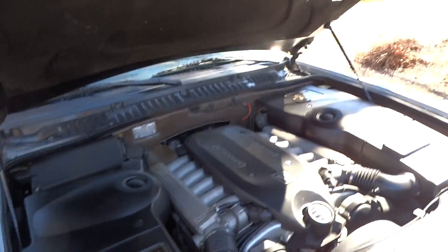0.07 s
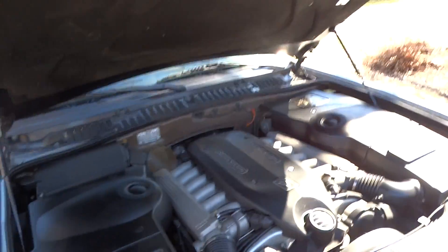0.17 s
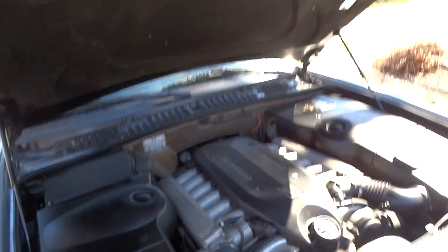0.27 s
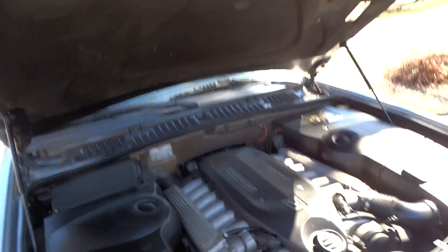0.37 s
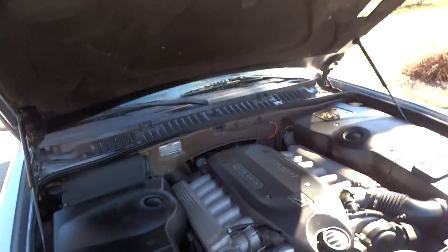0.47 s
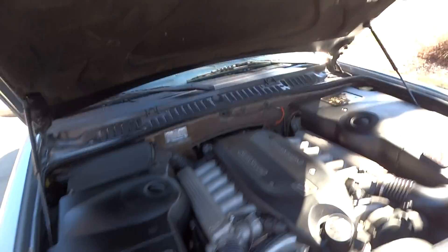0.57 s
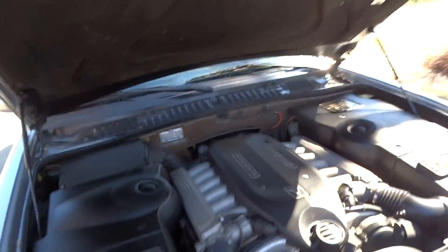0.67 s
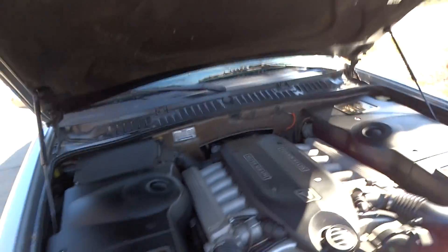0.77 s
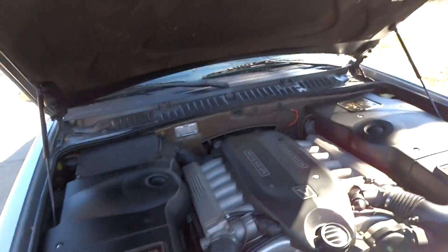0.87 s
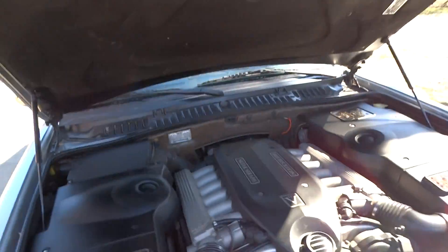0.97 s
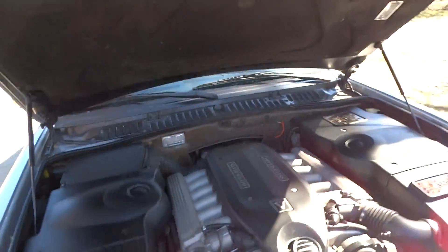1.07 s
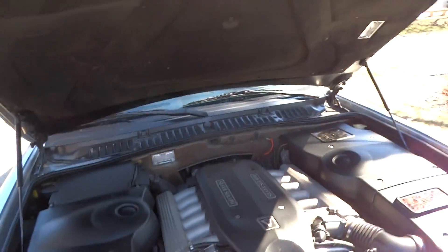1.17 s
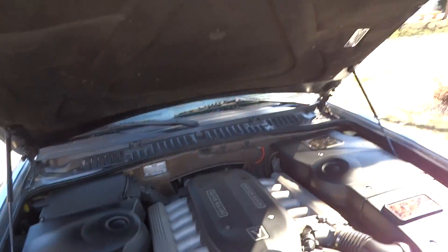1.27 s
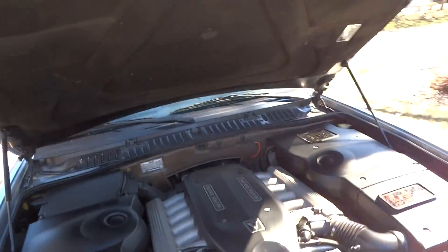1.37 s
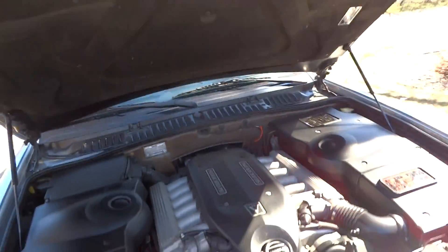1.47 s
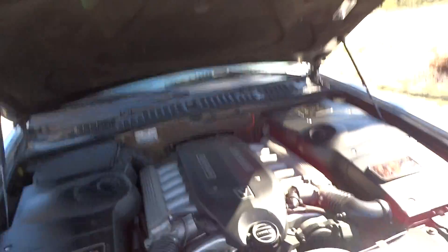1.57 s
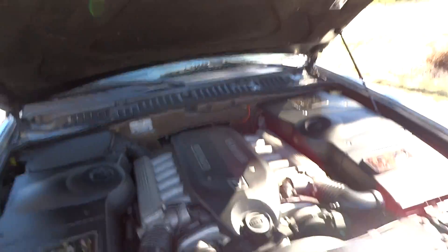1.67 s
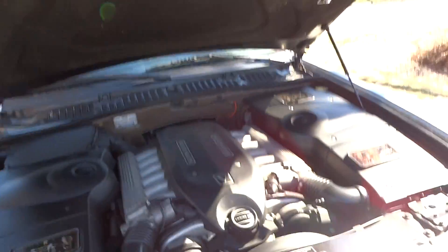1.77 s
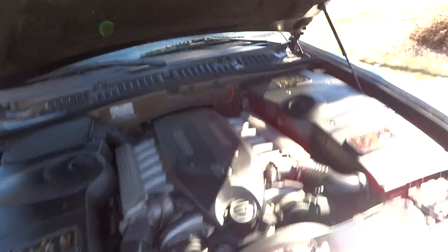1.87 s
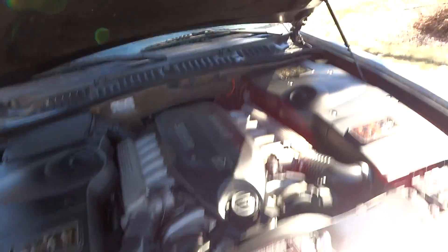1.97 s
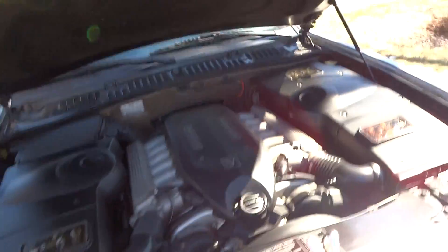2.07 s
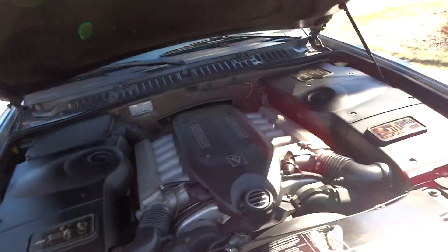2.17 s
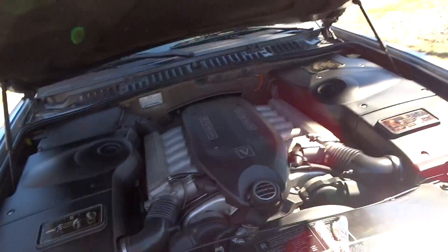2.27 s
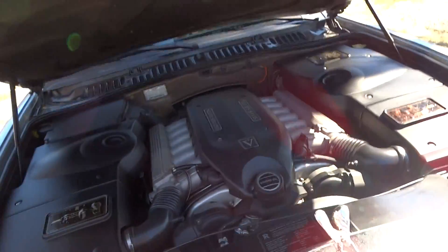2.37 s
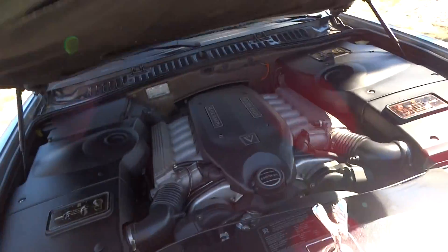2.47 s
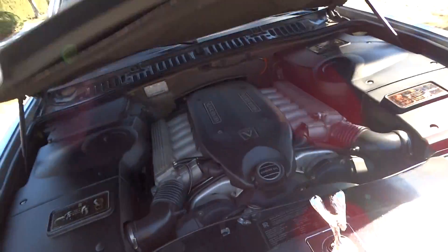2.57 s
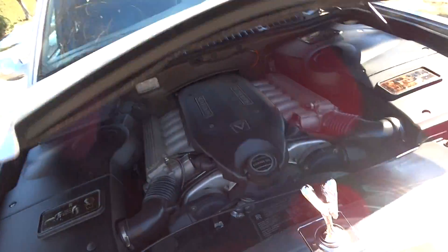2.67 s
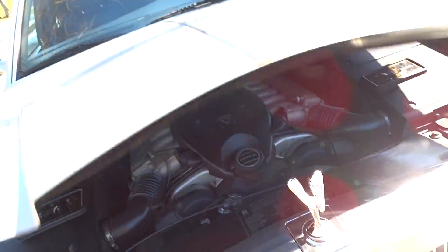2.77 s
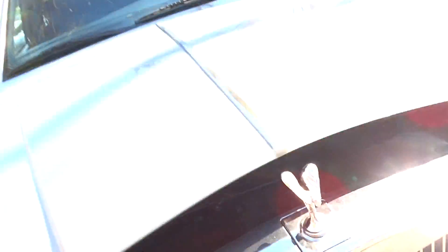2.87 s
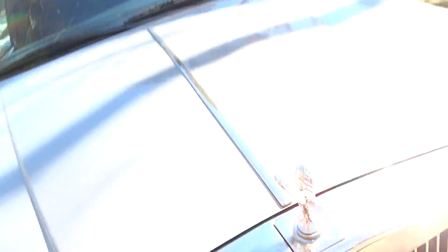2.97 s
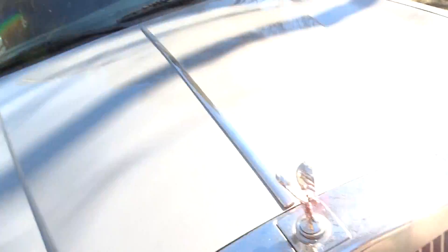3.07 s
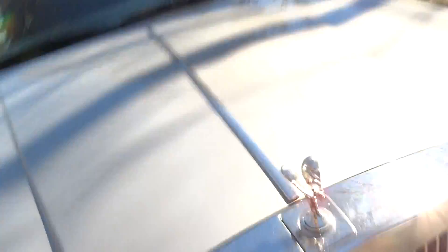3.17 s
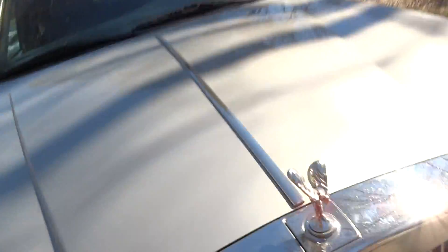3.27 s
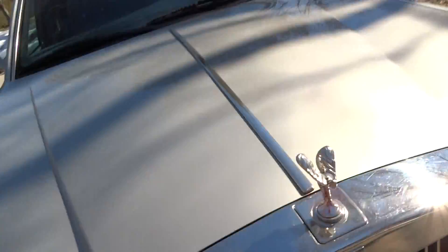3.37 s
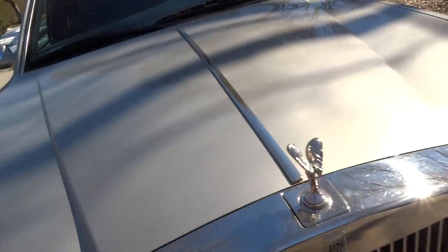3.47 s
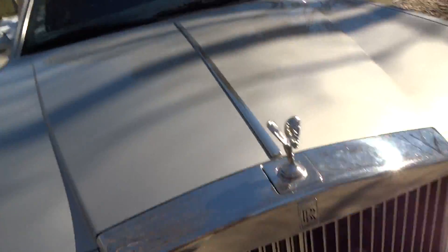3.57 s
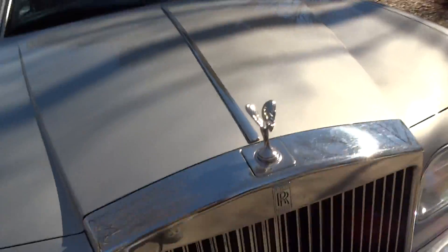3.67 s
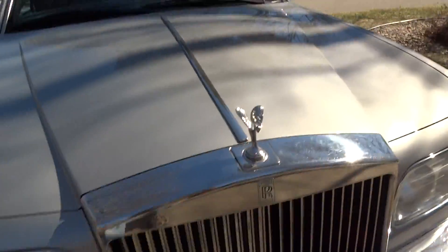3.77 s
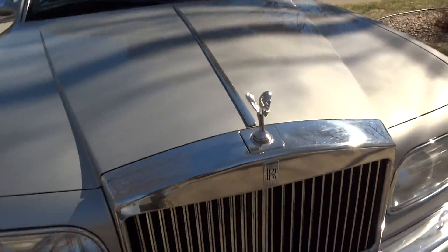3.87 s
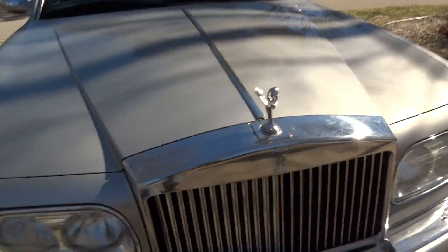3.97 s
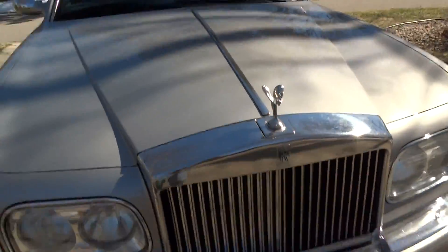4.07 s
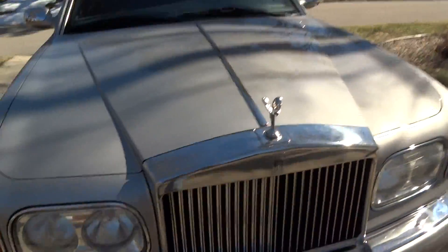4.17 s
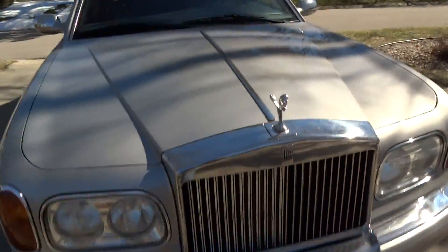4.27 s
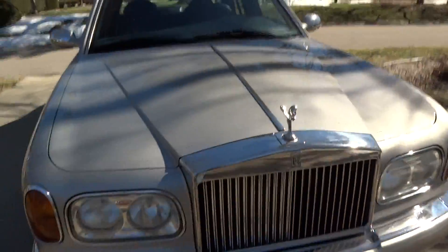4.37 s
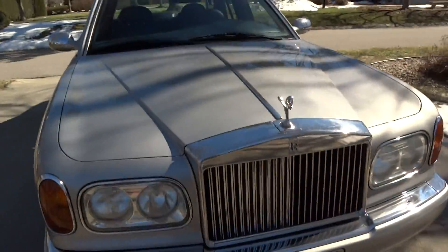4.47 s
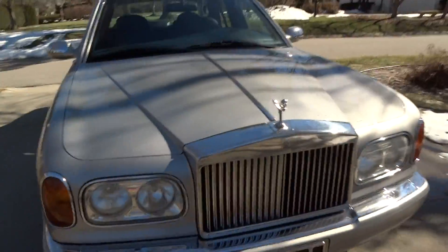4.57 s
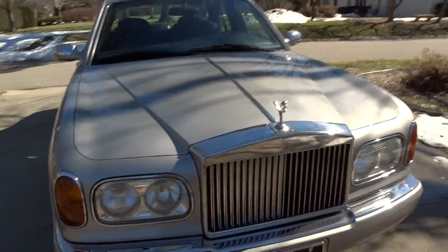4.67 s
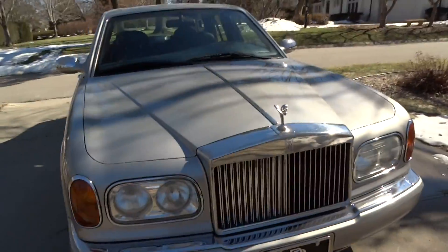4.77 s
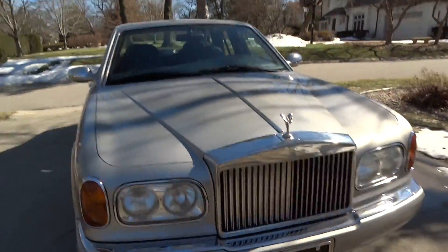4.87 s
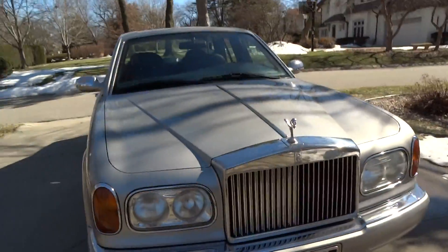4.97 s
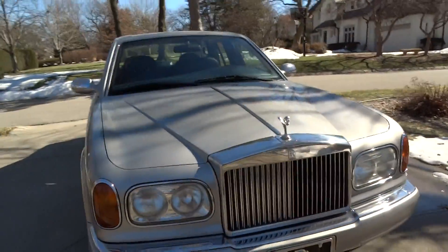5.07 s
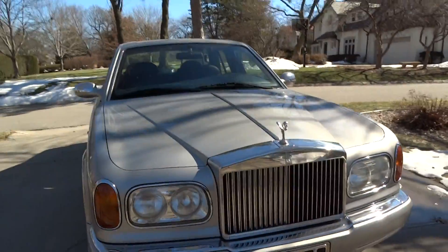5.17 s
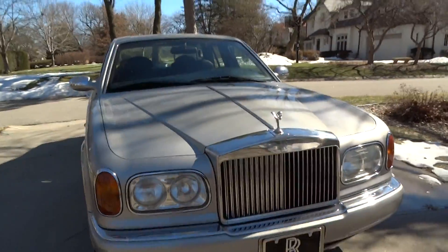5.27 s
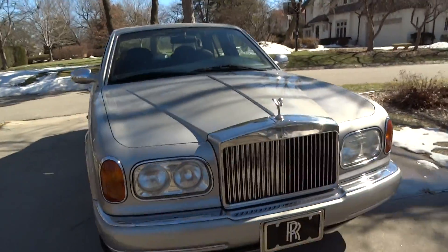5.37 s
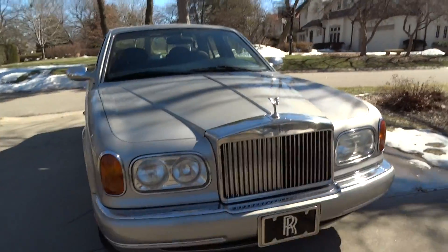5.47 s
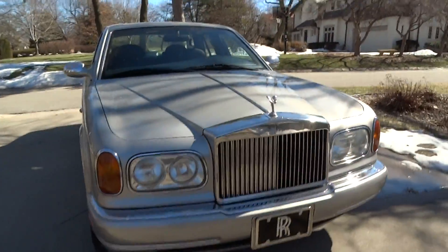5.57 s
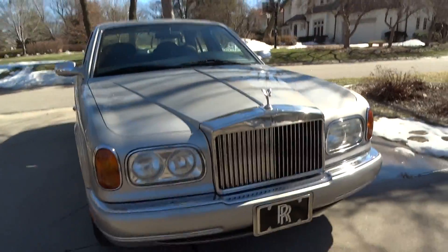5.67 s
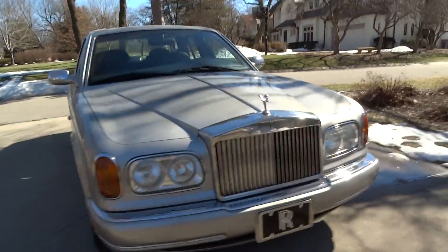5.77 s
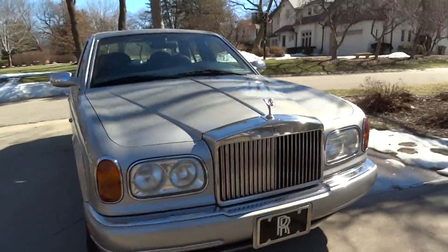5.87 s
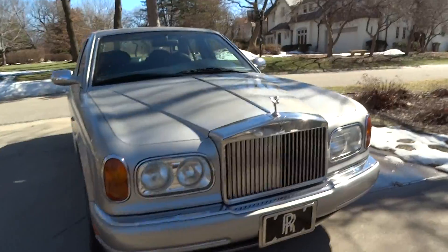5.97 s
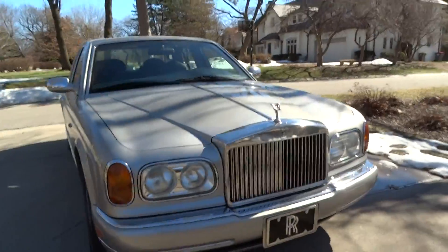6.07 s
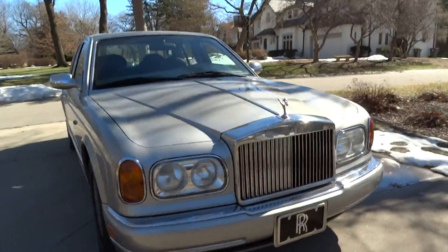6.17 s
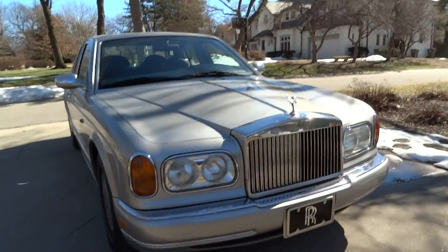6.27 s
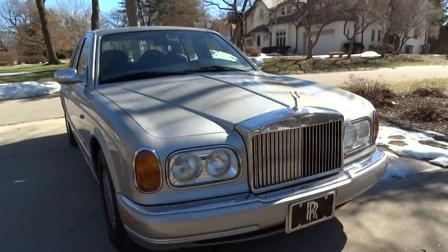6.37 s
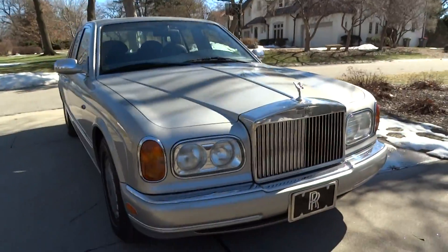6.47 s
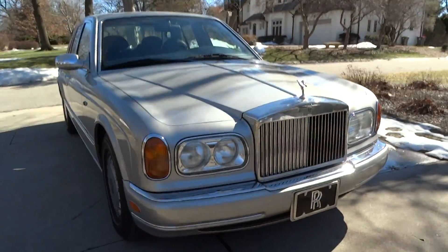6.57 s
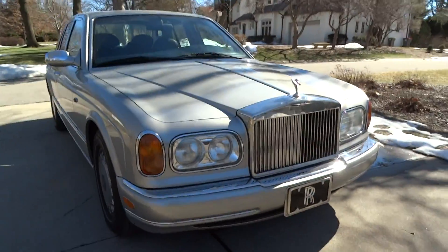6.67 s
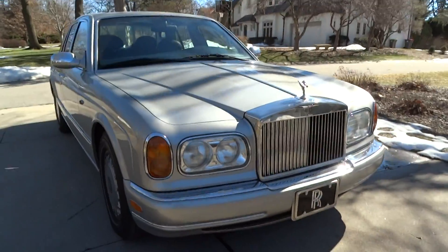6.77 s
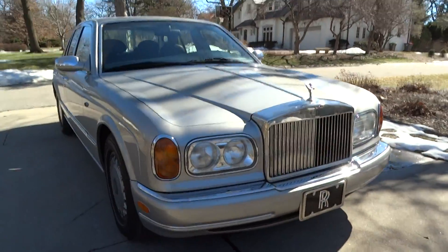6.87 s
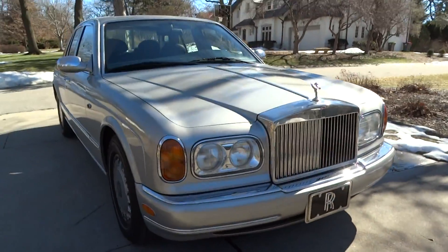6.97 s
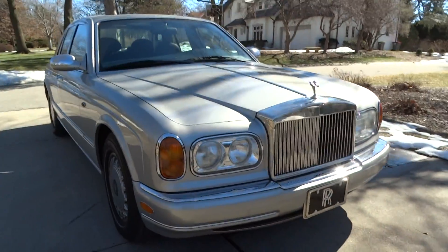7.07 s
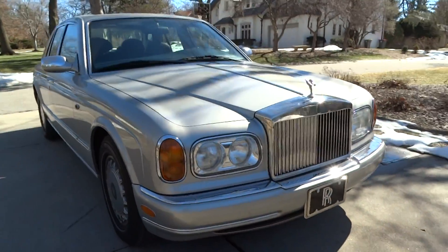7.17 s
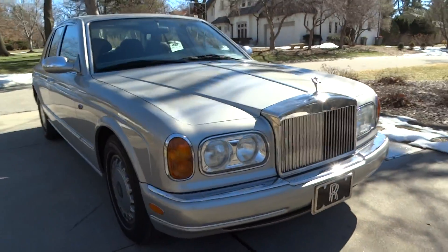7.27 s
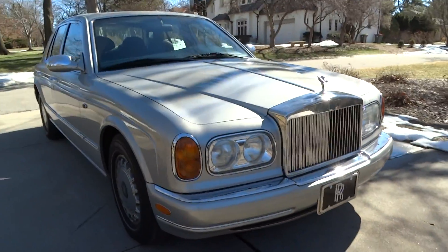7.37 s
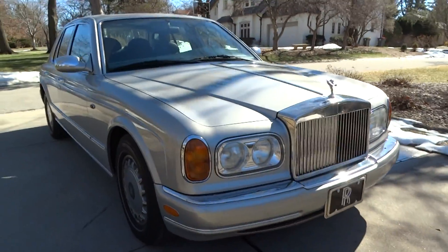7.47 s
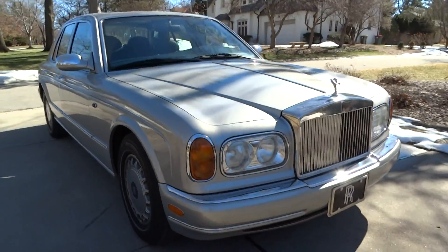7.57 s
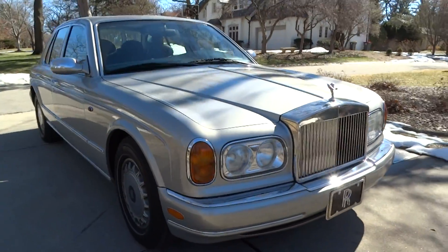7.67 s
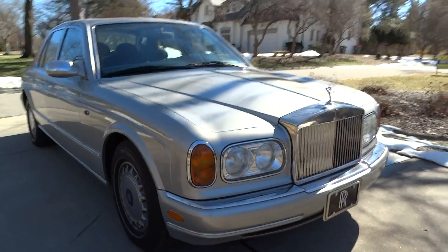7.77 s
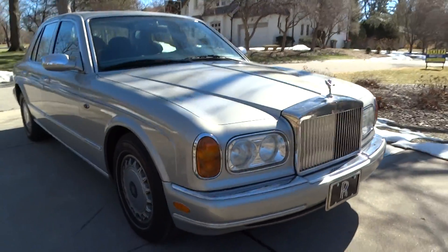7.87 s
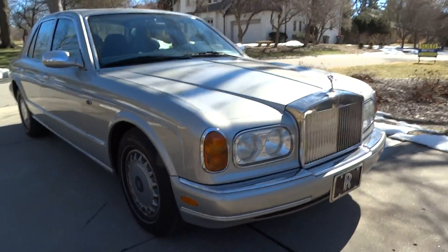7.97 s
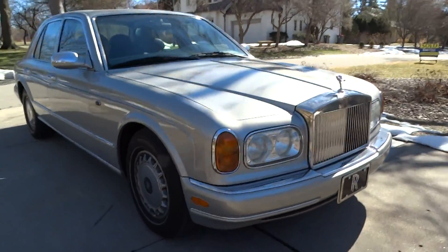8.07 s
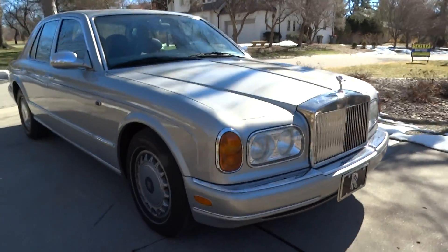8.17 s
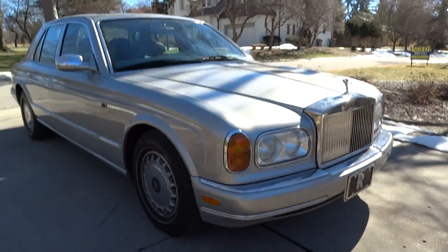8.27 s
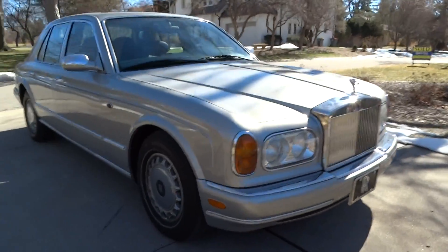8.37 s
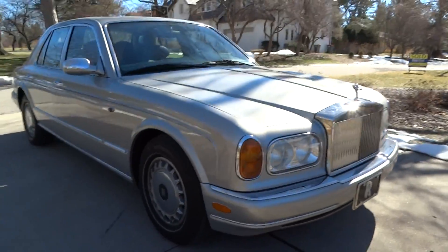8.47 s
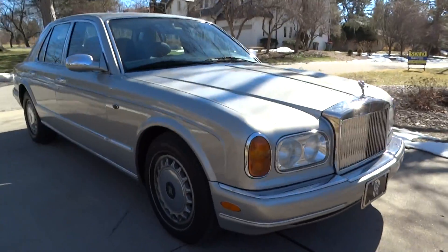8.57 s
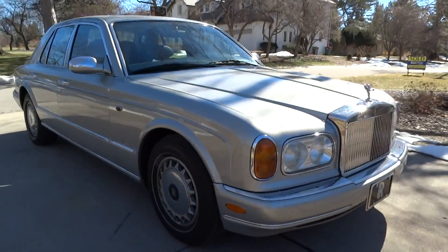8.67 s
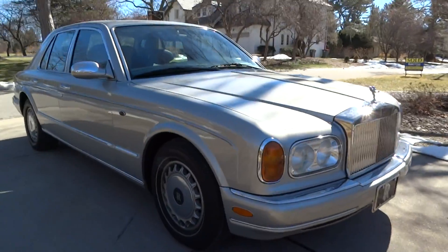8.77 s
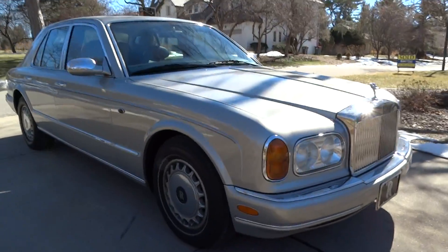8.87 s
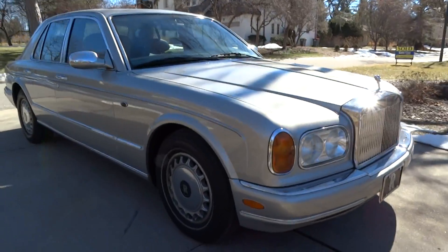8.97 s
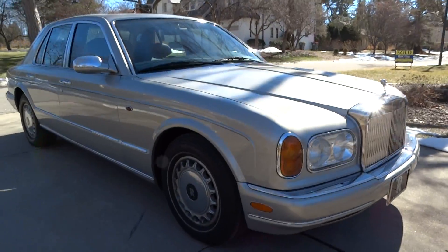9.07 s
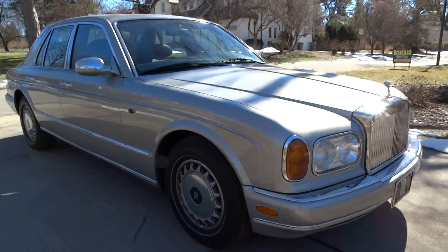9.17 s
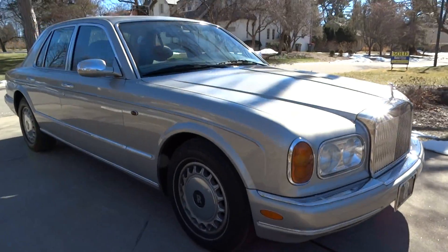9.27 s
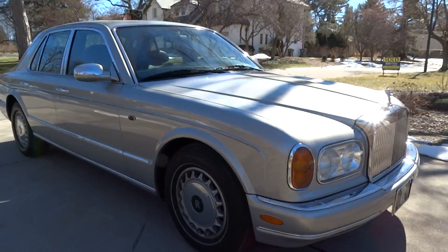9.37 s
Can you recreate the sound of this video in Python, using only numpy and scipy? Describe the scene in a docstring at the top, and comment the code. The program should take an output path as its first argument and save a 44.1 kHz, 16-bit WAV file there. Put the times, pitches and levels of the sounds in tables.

```python
"""A big car idles very quietly: its open engine bay hisses in time with the firing and a belt pulley whines.
The heavy bonnet is slammed: latch steel clangs, the panel lands, chatters and rings, and the hiss is shut in.
A plastic shell clicks in the hand, a sole scuffs over grit, feet thud softly and a far vehicle starts to hum.
Hiss and scrapes are coloured noise, metal and plastic are struck decaying modes, whine and hum are sines."""
import sys
import numpy as np
from scipy import signal
from scipy.fft import rfft, irfft, next_fast_len
from scipy.io import wavfile
from scipy.ndimage import map_coordinates

SR = 44100
rng = np.random.default_rng(int(sys.argv[2]) if len(sys.argv) > 2 else 0)


def file_out(sig):
    """Save sig as 16-bit WAV at sys.argv[1]."""
    # one column per channel
    cols = np.atleast_2d(sig).T
    # limit, then scale
    lim = np.clip(cols, -1, 1)
    pcm = np.round(lim * 32767).astype(np.int16)
    wavfile.write(sys.argv[1], SR, pcm)


N = 414969

# Correlation of left with right: pitch_hz, likeness [0-1]
STEREO_LIKENESS = [(100, 0.94), (500, 0.9), (1200, 0.83), (2500, 0.99), (5500, 1), (8000, 1), (10000, 0.81),
                   (14000, 1)]
TOP_HZ = 15850  # nothing sounds above this

# Exhaust hum of the far vehicle
FAR_S, FAR_ATTACK_S, FAR_DB = 8.08, 0.12, -67.5
FAR_START_HZ, FAR_TOP_HZ, FAR_CLIMB_S = 100.7, 123, 0.68  # climb: time constant of the pitch

# Soft thuds of feet and pushed air: middle_s, level_db, half_length_s
THUDS = [(.76, -55, 0.067), (2.01, -54, 0.053), (3, -43, 0.027), (3.86, -55.5, .025), (4.058, -64, .025),
         (9.014, -58, 0.031)]
# Relative spectrum of the thuds: pitch_hz, level_db [per Hz]
THUD_COLOUR = [(20, -14), (55, -9), (150, -0.5), (320, 3.5), (600, -4), (1500, -40)]

# Relative spectrum of the open engine bay: pitch_hz, level_db [per Hz]
BAY_COLOUR = [(24, -56), (40, -28), (242, -12.5), (380, -7.5), (693, -10.5), (935, -4), (1030, -6.5),
              (1840, -3.5), (2810, -5.5), (3440, -1.5), (6580, -5), (8450, -3), (10100, -10), (14700, -13),
              (15800, -19)]
# Resonances of the bay, relative to its colour: pitch_hz, width_hz, level_db
BAY_PEAKS = [(364, 110, -2.5), (505, 57, 0), (797, 100, 1), (933, 54, -6.5), (1336, 180, -0.5),
             (1870, 140, -1), (2150, 660, -6), (3500, 260, -11), (5100, 1000, -7), (8430, 2200, -5)]
# Part of the bay's power that pulses with the firing: pitch_hz, share [0-1]
PULSING_SHARE = [(900, 0.04), (2500, 0.35), (6000, 0.34), (9000, 0.91), (12000, 1.0)]
# Relative spectrum of the dull rush of the closed car: pitch_hz, level_db [per Hz]
BODY_COLOUR = [(20, -50.5), (40, -32), (120, -17), (200, -16.5), (290, -12.5), (400, -13), (510, -11),
               (700, -9), (1190, -9), (1700, -7), (2200, -7), (2650, -10.5), (3600, -10), (7000, -90)]
# Resonances of the closed car, relative to its colour: pitch_hz, width_hz, level_db
BODY_PEAKS = [(291, 27, -2.5), (781, 38, 0.5), (920, 56, 2), (1307, 31, -1.5), (2166, 165, -3.5)]
# Relative spectrum of the hiss through the grille: pitch_hz, level_db [per Hz]
GRILLE_COLOUR = [(20, -68.5), (1600, -35), (2950, -13.5), (3550, 0), (4150, -3), (5300, 0), (6300, -7),
                 (7600, -3), (9000, -7), (9900, -17.5), (11700, -17), (12600, -29), (15800, -26)]
# Level of the hiss through the grille: time_s, level_db
GRILLE_LEVEL = [(3.3, -52), (3.8, -48), (4.5, -48), (5.1, -49.5), (5.8, -49), (6.2, -50.5), (7.2, -49),
                (9.41, -49.5)]
BAY_DB = -38.5  # the engine with the bonnet up
BODY_DB = -48.5  # the closed car from close by
FALL_S, FALL_LENGTH_S, FALL_LOSS_DB = 2.755, 0.22, 9.5  # bay loss on landing; it goes on deepening
RETREAT_S, RETREAT_LENGTH_S = 4.67, 1  # the listener steps back
RETREAT_BODY_DB, RETREAT_WHINE_DB = -3, -6.5  # what that costs the rush and the whine
ASIDE_S, ASIDE_LENGTH_S = 7.1, 0.97  # the listener moves round to the wing
ASIDE_HZ, ASIDE_WIDTH_HZ, ASIDE_DB = 3100, 1500, -4  # the band that the grille beams forwards
# Narrow bands of noise that swell now and then: middle_s, half_length_s, pitch_hz, width_hz, level_db
SINGING_BANDS = [(.75, 0.23, 1850, 130, -52.5), (6.4, 0.83, 2146, 150, -57)]

# The hunting idle, as the pitch of the pulley: time_s, pitch_hz
IDLE = [(0, 918), (2.12, 920), (2.3, 939.5), (2.95, 959), (3.3, 939), (3.55, 950), (3.7, 923), (4.05, 933),
        (4.3, 952), (4.65, 934), (4.8, 913), (5.3, 913), (5.65, 931), (6.1, 922), (7.65, 933), (8.5, 935),
        (8.85, 955), (9.41, 925)]
CYCLES_PER_FIRING = 14.8  # pulley cycles to one firing
# Partials of the whine: ratio [to pulley pitch], level_db [relative]
WHINE_LINES = [(.835, -12.5), (1, 0), (1.19, -8.5), (2.25, -18)]
WHINE_ONSET_HZ, WHINE_KNEE_HZ = 915.2, 14.5  # the whine swells past this pitch, then levels off
WHINE_DB, WHINE_GROWTH_DB = -65, 18.5  # level at the onset pitch, most that speed adds
WHINE_SHUT_DB = -2.5  # what the closed bonnet takes off

# A sole scraping over grit: start_s, length_s, level_db
SCUFFS = [(3.92, 0.062, -48), (6.724, 0.15, -40), (6.888, 0.031, -31), (6.929, 0.028, -29.5),
          (6.97, 0.44, -49), (7.05, 0.023, -38.5), (7.165, .022, -44), (8.011, 0.095, -52.5)]
# Relative spectrum of grit, also used for the scatter of the shell: pitch_hz, level_db [per Hz]
GRIT_COLOUR = [(20, -80), (350, -46), (600, -18.5), (1070, -6), (1400, -6), (2820, -5), (5000, 2),
               (7050, -7), (8650, -1), (11500, -15), (15800, -30)]
# Single grains cracking under the sole: start_s, level_db, pitch_hz
GRAINS = [(6.8608, -23, 5100), (6.8928, -21, 4000), (6.936, -18, 3530), (7.0413, -25, 4000),
          (7.068, -23, 4550), (7.181, -28, 4400), (7.195, -23, 8500), (7.377, -29, 5000),
          (7.4185, -26, 4940), (8.007, -34, 5510)]
SCUFF_ATTACK_S, SCUFF_RELEASE_S = 0.02, 0.016  # rise, and time to fall by 1/e
RASP_S, RASP_LENGTH_S, RASP_DB = 6.708, 0.15, -36  # the sole rasps as weight comes on
RASP_ATTACK_S, RASP_RELEASE_S = 0.054, 0.029
RASP_START_HZ, RASP_END_HZ, RASP_SINK_S = 5410, 3140, 0.045  # its pitch sinks under the load

# Clicks of the shell: start_s, level_db, brightest_hz, slip_s [fall by 1/e], hollow_db
CLICKS = [(3.6645, -30, 1100, 0.0049, -50), (3.7662, -18, 3470, 0.0039, -45),
          (3.9314, -27.5, 4400, 0.018, -60), (4.3234, -27, 2403, 0.0021, -55),
          (4.3512, -31.5, 1043, 0.0074, -34), (4.7312, -25.5, 2590, 0.0035, -35.5),
          (4.8051, -18, 3970, .0002, -50), (4.959, -23, 1770, 0.005, -50), (4.999, -30, 2800, 0.0018, -57),
          (5.3223, -5.5, 3750, 0.00014, -40), (5.6273, -18, 4300, 0.0012, -37)]
# Modes of the plastic shell: pitch_hz, level_db [relative], t60_s
SHELL_MODES = [(930, -5.5, 0.027), (1360, -18.5, 0.044), (1940, -11.5, 0.016), (2270, -15.5, 0.016),
               (2790, -6, 0.0081), (3580, -0.5, 0.0048), (4340, 0, 0.007), (5400, -13, 0.0038),
               (7930, -13, 0.0044), (8900, -25, 0.004)]
HOLLOW_HZ, HOLLOW_T60_S = 1350, 0.069  # the air inside the shell

# Bonnet contacts: start_s, latch_db, panel_db, freedom [share of the free ringing time, 0-1]
SLAM = [(2.9688, -15, -42, 0.38), (2.9835, -18.5, -22, 0.23), (2.9938, -14, -30.5, 0.98),
        (3.008, -18, -19.5, 0.8), (3.02, -22.5, -12.5, 0.9)]
# Relative spectrum of the struck latch: pitch_hz, level_db [per Hz]
LATCH_COLOUR = [(40, -54), (150, -39), (400, -16), (800, -14), (1400, -4), (2000, -7.5), (2740, -9),
                (3740, -2), (5520, -1), (6800, -2.5), (8470, -1.5), (10500, -17.5), (15800, -25)]
# Modes of the steel latch, ringing freely: pitch_hz, level_db [relative], t60_s
LATCH_MODES = [(3610, 2, 0.24), (4640, 8, 0.26), (4820, -5, 0.25), (5070, 3, 0.24), (5180, -4, 0.54),
               (5500, 5, 0.22), (5700, -5, .26), (5882, 1, .26), (7900, -2, 0.19), (8600, 2, .16)]
# Relative spectrum of the struck panel: pitch_hz, level_db [per Hz]
PANEL_COLOUR = [(20, -70), (45, -50), (140, -27), (215, -17), (295, -2), (360, -7.5), (490, -2), (614, -7),
                (740, -1.5), (1000, -9.5), (1750, -12.5), (5400, -15.5), (9200, -27), (15800, -49)]
# Modes of the bonnet panel, ringing freely: pitch_hz, level_db [relative], t60_s
PANEL_MODES = [(117, -30, 0.62), (204, -17, 0.52), (224, -15.5, 0.75), (288, 4, 0.22), (310.7, -1, 0.35),
               (325.6, -17.5, 1.82), (395, -2.5, 0.33), (422, -4.5, 0.59), (481, -3, 0.28), (518, -7, 0.39),
               (580, -13, .42), (748, 0, 0.33), (810, -3, 0.29), (850, -2.5, 0.29), (1006, -4, 0.27),
               (1060, -12, .33), (1240, -7.5, 0.61), (1330, -17.5, 1.05), (1430, -8, .33),
               (1910, -13, 0.34), (2050, -22, 0.57), (3120, 0.5, 0.22), (3430, -13.5, 0.71),
               (3600, -8, 0.34), (3730, -16, .6)]
# Free ringing time of dense steel modes: pitch_hz, t60_s
STEEL_DECAY = [(60, 0.69), (220, 0.73), (500, 0.54), (1200, 0.49), (3500, 0.41), (6000, 0.27),
               (14000, 0.17)]
CHATTER_GAP_S, CHATTER_SPREAD = 0.02, 1.2  # first gap after landing, each gap over the one before
CHATTER_LATCH_DB, CHATTER_PANEL_DB, CHATTER_FREEDOM = -23, -16, 0.57  # levels before they die away
CHATTER_LATCH_LIFE_S, CHATTER_PANEL_LIFE_S = 0.27, 0.2  # time to die by 60 dB


def amp(db):
    """Decibels to gain."""
    return np.exp(np.asarray(db) * (np.log(10) / 20))


def unit(x):
    """Scale to rms 1."""
    return x / np.sqrt(np.mean(x ** 2) + 1e-20)


def along(points, hz):
    """Read a (pitch_hz, value) table on a log pitch axis."""
    f, v = np.transpose(points)
    return np.interp(np.log(hz + 1), np.log(f + 1), v)


def curves(rows):
    """One value per sample for each column after the time."""
    s, *columns = np.transpose(rows)
    return [np.interp(np.arange(N) / SR, s, column) for column in columns]


def ramp(s, length_s):
    """A straight rise from 0 to 1 that starts at time s."""
    return np.clip((np.arange(N) / SR - s) / length_s, 0, 1)


def stroke(s, length_s, attack_s, release_s):
    """Attack, hold and exponential release."""
    overrun = np.maximum(np.arange(N) / SR - s - length_s, 0)
    return ramp(s, attack_s) * np.exp(-overrun / release_s)


def swell(middle_s, half_s):
    """A bell-shaped rise and fall of peak 1."""
    t = np.arange(N) / SR
    return np.exp(-0.5 * ((t - middle_s) / half_s) ** 2)


def glide(s, start_hz, end_hz, settle_s):
    """A sine whose pitch settles from one value to another after time s."""
    age = np.maximum(np.arange(N) / SR - s, 0)
    hz = end_hz + (start_hz - end_hz) * np.exp(-age / settle_s)
    return np.sin(2 * np.pi * np.cumsum(hz) / SR)


def wobble(rate):
    """A smooth random curve, rate knots a second."""
    knots = N * rate / SR
    positions = np.linspace(0, knots, 10 * int(knots) + 2)
    coarse = map_coordinates(rng.standard_normal(int(knots) + 4), [positions])
    return np.interp(np.arange(N), np.linspace(0, N, len(coarse)), coarse)


def filtered(x, response):
    """Multiply the spectrum of x by a response of frequency."""
    n = x.shape[-1]
    m = next_fast_len(n + 8192)
    return irfft(rfft(x, m) * response(np.fft.rfftfreq(m, 1 / SR)), m)[..., :n]


def thin(x, corner_hz):
    """Small parts radiate little below their corner frequency."""
    return signal.sosfilt(signal.butter(3, corner_hz, "highpass", fs=SR, output="sos"), x)


def noise(colour, peaks=(), size=N, drive=1):
    """Nearly mono stereo noise of rms 1: a broad colour with resonances standing on it."""
    def response(hz):
        humps = sum(amp(db) / (1 + (2 * (hz - centre) / width) ** 2) for centre, width, db in peaks)
        turn = np.arccos(np.clip(along(STEREO_LIKENESS, hz), 0, 1)) / 2
        return amp(along(colour, hz)) * (1 + humps) * np.array([np.cos(turn), np.sin(turn)])
    mid, side = filtered(drive * rng.standard_normal((2, size)), response)
    return unit(np.array([mid + side, mid - side]))


def add(track, s, sound):
    """Mix a sound into a track at time s."""
    start = round(s * SR)
    track[..., start:start + sound.shape[-1]] += sound[..., :N - start]


def far_vehicle():
    """The exhaust note of a far vehicle climbs as it gathers speed."""
    level = ramp(FAR_S, FAR_ATTACK_S) * amp(FAR_DB + 2.12 * wobble(12))
    return level * glide(FAR_S, FAR_START_HZ, FAR_TOP_HZ, FAR_CLIMB_S)


def thuds():
    """Dull low swells of noise from shifting feet and pushed air."""
    return noise(THUD_COLOUR) * sum(amp(db) * swell(s, half) for s, db, half in THUDS)


def walls(x, echo_db, count=10):
    """Near metal walls send back weak copies at fixed delays, whose strengths drift and shift the comb."""
    delays = (SR * rng.uniform(0.001, 0.014, count)).astype(int)
    return unit(x + sum(amp(echo_db) * wobble(1.235) * np.roll(x, delay, -1) for delay in delays))


def injectors(depth_db, scatter_db):
    """A spurt of hiss for each firing of the twelve cylinders, in step with the idle."""
    firings = np.cumsum(curves(IDLE)[0] / CYCLES_PER_FIRING) / SR
    size = 1 + 0.13 * rng.standard_normal(size=12)[firings.astype(int) % 12]
    spurt = (0.5 - 0.5 * np.cos(2 * np.pi * (firings % 1) ** 0.85)) * size
    return unit(amp(depth_db * spurt + scatter_db * wobble(140)))


def open_bay(spurts):
    """Hiss from the bay: the treble pulses most with the firing, the rest is steady between metal walls."""
    def share(hz):
        return np.clip(along(PULSING_SHARE, hz), 0, 1)
    pulsing = filtered(noise(BAY_COLOUR, BAY_PEAKS, drive=spurts), lambda hz: np.sqrt(share(hz)))
    steady = walls(noise(BAY_COLOUR, BAY_PEAKS), echo_db=-18)
    steady = filtered(steady, lambda hz: np.sqrt(1 - share(hz)))
    return amp(BAY_DB + 0.27 * wobble(8)) * (pulsing + steady)


def closed_body():
    """The dull resonant rush of the closed car, softer once the listener steps back."""
    db = BODY_DB + RETREAT_BODY_DB * ramp(RETREAT_S, RETREAT_LENGTH_S)
    return amp(db + 0.73 * wobble(6)) * noise(BODY_COLOUR, BODY_PEAKS)


def grille(spurts):
    """Pulsing hiss escapes forwards through the grille; its beamed band drops as the listener moves aside."""
    hiss = walls(noise(GRILLE_COLOUR, drive=1 + 0.44 * spurts), echo_db=-26)
    hiss = amp(curves(GRILLE_LEVEL)[0]) * hiss
    beam = filtered(hiss, lambda hz: np.exp(-(2 * (hz - ASIDE_HZ) / ASIDE_WIDTH_HZ) ** 2))
    return hiss - (1 - amp(ASIDE_DB)) * ramp(ASIDE_S, ASIDE_LENGTH_S) * beam


def engine():
    """The open bay gives way to the closed car and its grille as the bonnet falls."""
    fallen = np.maximum(np.arange(N) / SR - FALL_S, 0) / FALL_LENGTH_S
    gap = amp(-FALL_LOSS_DB * fallen ** 2)  # the bonnet gathers speed
    spurts = injectors(depth_db=6, scatter_db=2.04)
    return gap * open_bay(spurts) + (1 - gap) * (closed_body() + grille(spurts))


def singing():
    """Now and then one narrow band of noise swells and fades."""
    def band(centre, width):
        response = lambda hz: 1 / (1 + (2 * (hz - centre) / width) ** 2)
        return unit(filtered(rng.standard_normal(N), response))
    return sum(amp(db) * swell(s, half) * band(hz, width) for s, half, hz, width, db in SINGING_BANDS)


def pulley():
    """A thin unsteady whine that grows louder whenever the idle lifts."""
    hz, = curves(IDLE)
    db = WHINE_DB + WHINE_GROWTH_DB * np.tanh((hz - WHINE_ONSET_HZ) / WHINE_KNEE_HZ)
    db = db + WHINE_SHUT_DB * ramp(FALL_S + FALL_LENGTH_S, 0.05)
    db = db + RETREAT_WHINE_DB * ramp(RETREAT_S, RETREAT_LENGTH_S)
    phase = 2 * np.pi * np.cumsum(hz * (1 + 0.0026 * wobble(45))) / SR
    return sum(amp(db + line_db + 0.44 * wobble(10)) * np.sin(ratio * phase)
               for ratio, line_db in WHINE_LINES)


def scuffs():
    """A sole drags over grit: dense clumped grains and a rasp that sinks in pitch."""
    pressure = sum(amp(db) * stroke(s, length, SCUFF_ATTACK_S, SCUFF_RELEASE_S)
                   for s, length, db in SCUFFS)
    grains = (rng.random(N) < 10000 / SR) * amp(2.46 * wobble(260))  # about 10000 a second
    # low noise rides on the gliding sine and roughens it into a rasp
    roughness = unit(filtered(rng.standard_normal(N), lambda hz: 1 / (1 + (hz / 650) ** 2.3)))
    carrier = glide(RASP_S, RASP_START_HZ, RASP_END_HZ, RASP_SINK_S)
    rasp = unit(roughness * amp(1.5 * wobble(200)) * carrier)
    weight = amp(RASP_DB) * stroke(RASP_S, RASP_LENGTH_S, RASP_ATTACK_S, RASP_RELEASE_S)
    return thin(pressure * noise(GRIT_COLOUR, drive=grains) + weight * rasp, corner_hz=503)


def grit():
    """A grain cracks in a snap of a few cycles and a spray of dust."""
    out, t = np.zeros((2, N)), np.arange(SR // 20) / SR
    age = t / 0.00026
    for s, db, hz in GRAINS:
        snap = age * np.exp(1 - age) * np.sin(2 * np.pi * hz * t)
        dust = noise(GRIT_COLOUR, size=len(t)) * amp(-10.5 - 60 * t / 0.012)
        add(out, s, amp(db) * (snap + dust))
    return thin(out, corner_hz=600)


def clicks():
    """A seam of the shell slips in quick jerks that ring its modes, brighter or duller from click to click."""
    out, t = np.zeros((2, N)), np.arange(SR // 10) / SR
    hz, mode_db, t60 = np.transpose(SHELL_MODES)[:, :, None]
    side = np.cos(np.pi * np.arange(len(hz)))[:, None]  # neighbouring modes swing opposite ways
    for s, db, bright_hz, slip_s, hollow_db in CLICKS:
        dulling_db = 3.85 * np.log2(hz / bright_hz) ** 2  # modes far from the brightest are weaker
        gain = side * amp(mode_db - dulling_db + rng.standard_normal(hz.shape))
        modes = np.sum(gain * np.sin(2 * np.pi * hz * t) * amp(-60 * t / t60), 0)
        jerk = modes * (1 - np.exp(-t / 0.000098))
        slips = (rng.random(len(t)) < 3000 / SR) * rng.standard_normal(len(t))
        slips = slips * 0.5 * np.exp(-t / slip_s)
        slips[0] = 1
        click = signal.fftconvolve(jerk, slips)[:len(t)]
        scatter_gain = amp(-31 - 60 * t / 0.0088) + amp(-30.5 - 60 * t / 0.06)
        scatter = noise(GRIT_COLOUR, size=len(t)) * scatter_gain
        hollow = amp(hollow_db - 60 * t / HOLLOW_T60_S) * np.sin(2 * np.pi * HOLLOW_HZ * t)
        add(out, s, amp(db) * (click / np.abs(click).max() + scatter) + hollow)
    return thin(out, corner_hz=637)


def ring(modes, s, t, freedom):
    """Damped modes struck at time s, their phases kept near a common clock so that blows build up."""
    hz, db, t60 = np.transpose(modes)[:, :, None]
    gain = amp(db)
    waves = np.sin(2 * np.pi * (hz * (s + t) + 0.3 * rng.random(hz.shape)))
    decay = amp(-60 * t / (freedom * t60))
    return np.sum(gain * waves * decay, 0) / np.sqrt(np.sum(gain ** 2) / 2)


def clang(colour, freedom):
    """Countless steel modes struck at once, as noise whose high bands die first."""
    hz, t, bands = signal.stft(noise(colour, size=SR // 2), SR, nperseg=256)
    decay = amp(-60 * t / (freedom * along(STEEL_DECAY, hz)[:, None]))
    return signal.istft(bands * decay, SR, nperseg=256)[1][:, :SR // 2]


def chatter(count=6):
    """After landing the panel rattles on its stops, ever slower and weaker: rows like those of SLAM."""
    rows = []
    for age in np.cumsum(CHATTER_GAP_S * CHATTER_SPREAD ** np.arange(count)):
        latch_db = CHATTER_LATCH_DB - 60 * (age / CHATTER_LATCH_LIFE_S) ** 2
        panel_db = CHATTER_PANEL_DB - 60 * (age / CHATTER_PANEL_LIFE_S) ** 2
        rows.append((SLAM[-1][0] + age, latch_db, panel_db, CHATTER_FREEDOM))
    return rows


def bonnet():
    """The safety hook and latch strike first; then the panel lands on its stops, chatters and rings."""
    latch, panel = np.zeros((2, 2, N))
    t = np.arange(SR) / SR
    early = t[:SR // 2]
    for s, latch_db, panel_db, freedom in SLAM + chatter():
        steel = amp(0.5) * clang(LATCH_COLOUR, freedom)
        steel = steel + amp(-12.5) * ring(LATCH_MODES, s, early, freedom)
        bite = 1 + 0.29 * np.exp(-early / 0.0023)  # a slightly harder onset
        add(latch, s, amp(latch_db) * steel * bite)
        rise = amp(panel_db) * (1 - np.exp(-t / 0.0018))  # the wide sheet takes time to move
        add(panel, s, amp(-0.8) * rise[:SR // 2] * clang(PANEL_COLOUR, freedom))
        add(panel, s, amp(-9) * rise * ring(PANEL_MODES, s, t, freedom ** 0.5))
    return thin(latch, corner_hz=450) + panel


def scene():
    """Everything is close and dry in the open air, but for the far vehicle's faint hum."""
    background = far_vehicle() + thuds()
    car = engine() + singing() + pulley()
    return background + car + scuffs() + grit() + clicks() + bonnet()


def record(dry):
    """Round the highest peaks and keep nothing above the band limit."""
    rounded = dry / (1 + np.abs(dry / 0.7) ** 6) ** (1 / 6)
    return filtered(rounded, lambda hz: hz < TOP_HZ)


dry = scene()
out = record(dry)
file_out(out)
```